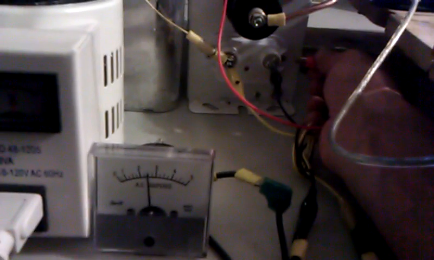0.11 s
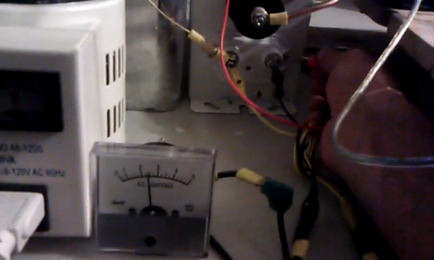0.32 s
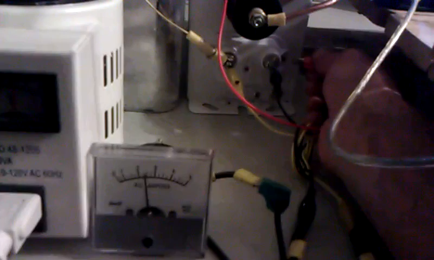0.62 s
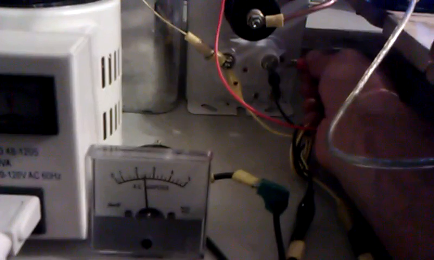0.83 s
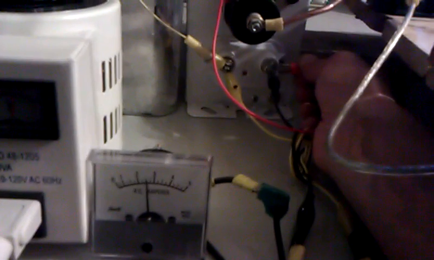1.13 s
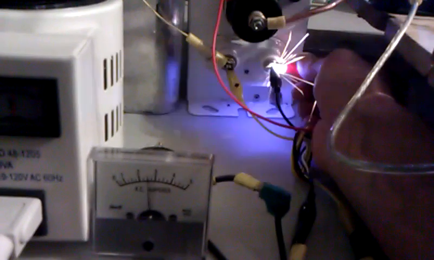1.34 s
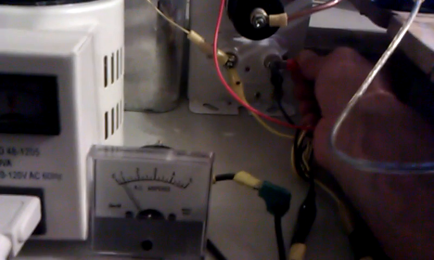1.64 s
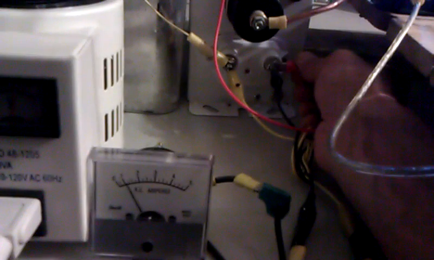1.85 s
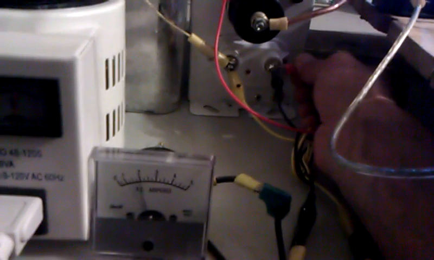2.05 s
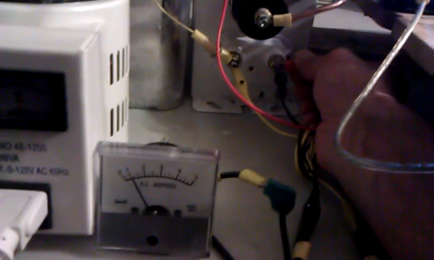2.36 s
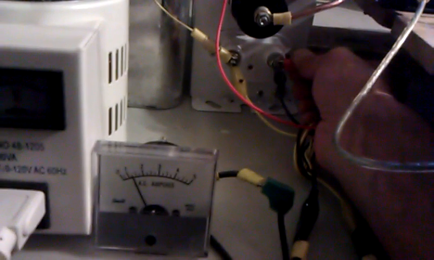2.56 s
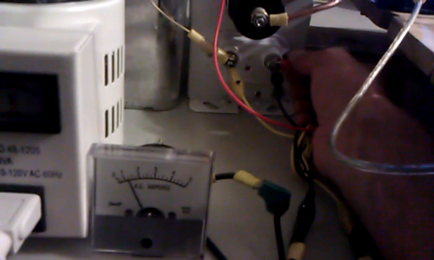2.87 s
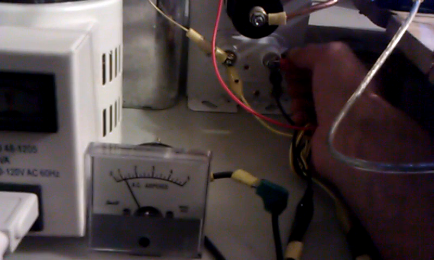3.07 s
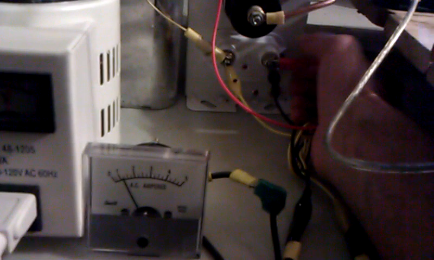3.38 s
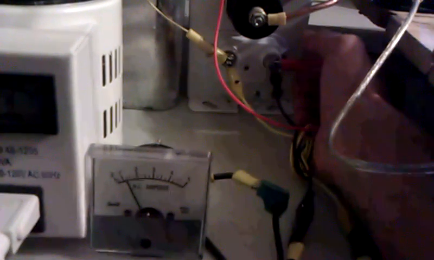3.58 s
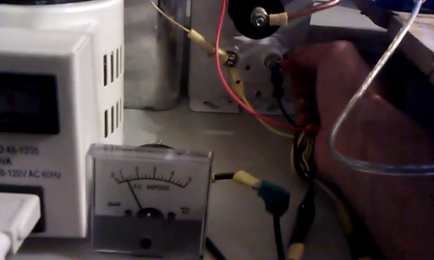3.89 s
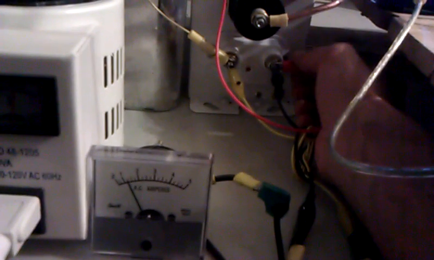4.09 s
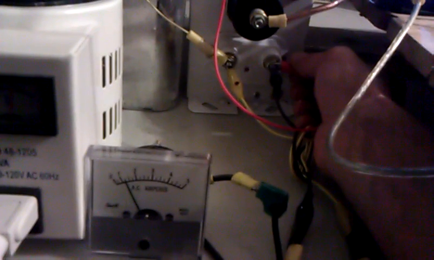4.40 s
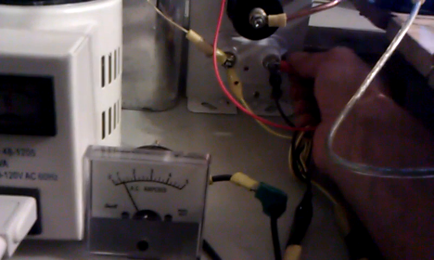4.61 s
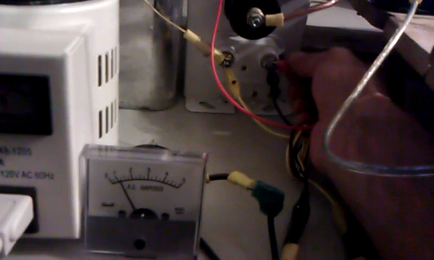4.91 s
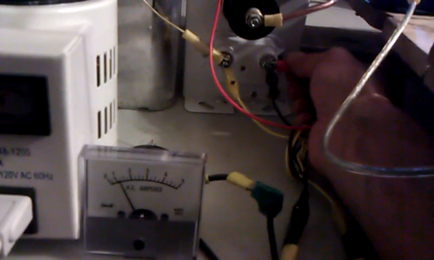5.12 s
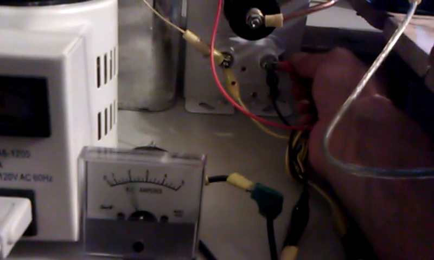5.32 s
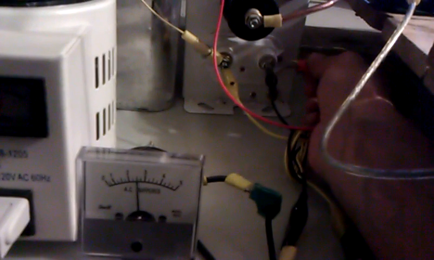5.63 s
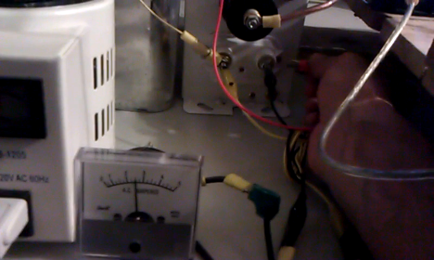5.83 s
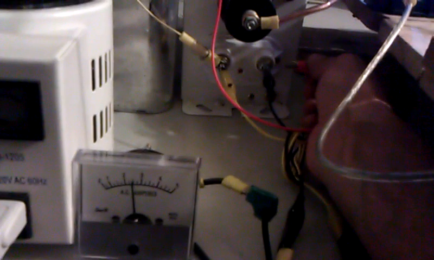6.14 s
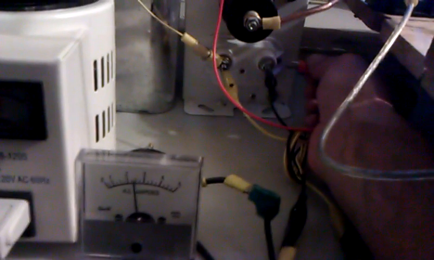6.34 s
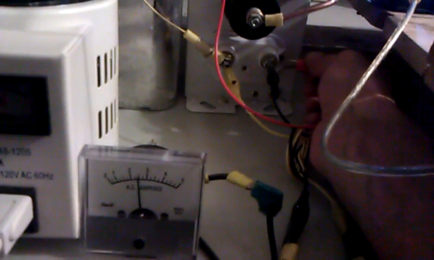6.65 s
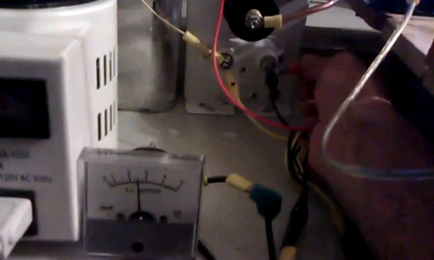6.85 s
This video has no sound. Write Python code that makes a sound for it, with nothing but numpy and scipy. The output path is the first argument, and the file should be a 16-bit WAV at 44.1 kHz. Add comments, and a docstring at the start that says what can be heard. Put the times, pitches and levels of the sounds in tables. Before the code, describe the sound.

Rapid electrical snapping runs without a break as a high-voltage spark jumps a small gap on a workbench. The cracks are crisp, thin and nearly regular, like a fast ticking rattle, each with a very short ringing tail from the small room. The nearby microphone distorts slightly, hisses softly and picks up small low pops of interference with the sparks, a little stronger through the middle.

```python
"""A small workshop, where a capacitor charged by a high-voltage transformer breaks down a spark gap
about fifteen times a second. Each spark is one sharp crack, which bench, cases and walls return in
nearly the same pattern of echoes and resonances. One weak partial discharge adds a dull tick.
The small microphone close by rings in the treble and overloads; its circuit hisses and takes an
electrical kick from each breakdown."""
import sys
import numpy as np
from scipy import signal
from scipy.fft import rfft, irfft, next_fast_len
from scipy.io import wavfile

SR = 44100
rng = np.random.default_rng(int(sys.argv[2]) if len(sys.argv) > 2 else 0)


def store_pcm(level_fs):
    """Save levels as 16-bit WAV."""
    pcm = np.round(np.clip(level_fs, -1, 1) * 32767).astype(np.int16)
    wavfile.write(sys.argv[1], SR, np.atleast_2d(pcm).T)


N = 308259
TAIL = SR // 3  # samples in the response to one spark


def amp(db):
    return 10 ** (np.asarray(db) / 20)


def along(points, hz):
    """Interpolation of (frequency, value) points on a logarithmic frequency axis."""
    point_hz, values = np.transpose(points)
    return np.interp(np.log(hz + 1), np.log(point_hz + 1), values)


def filtered(x, response):
    """Linear filtering: the spectrum is multiplied by a complex frequency response."""
    size = next_fast_len(N + SR)
    return irfft(rfft(x, size) * response(np.fft.rfftfreq(size, 1 / SR)), size)[:N]


def superpose(start_s, sounds):
    """Superposition: the sounds add at their start times, on a track that begins TAIL samples early."""
    track = np.zeros(N + 2 * TAIL)
    for start, sound in zip(start_s, sounds):
        track[round(start * SR) + TAIL:][:len(sound)] += sound
    return track


# Spectrum of the crack as the microphone colours it: frequency_hz, level_db
CRACK_SPECTRUM = [(60, -28.5), (480, -22), (900, -24.5), (2100, -23), (3450, -10.5), (4450, -17.5),
                  (5200, -7), (6260, -1), (7400, -6), (8200, -11), (11500, -7.5), (13800, -1.5), (15500, 4),
                  (16500, -11)]


def crack(band, size=1024):
    """Impulse response: one band of the crack as a minimum-phase pulse with an envelope peak of 1."""
    hz = np.fft.rfftfreq(size, 1 / SR)
    cepstrum = irfft(np.log(band(hz) * amp(along(CRACK_SPECTRUM, hz)) + 1e-4), size)
    causal = np.r_[cepstrum[:1], 2 * cepstrum[1:size // 2], np.zeros(size // 2)]
    pulse = irfft(np.exp(rfft(causal)), size)
    return pulse / np.abs(signal.hilbert(pulse)).max()


def near_scatter(count, rise_s=0.00053, t60_s=0.018):
    """Scattering: parts right beside the gap return a dense burst in the first milliseconds."""
    t = np.arange(TAIL) / SR
    return rng.standard_normal((count, TAIL)) * amp(-60 * t / t60_s) * (1 - np.exp(-(t / rise_s) ** 2))


# Low resonances of the bench: pitch_hz, level_db, t60_s
BENCH_MODES = [(259.7, -22.5, 0.078), (656, -13.5, 0.13)]
# Narrow resonances of cases and cavities around the gap: pitch_hz, level_db, t60_s
CASE_MODES = [(1798.0, -15.0, 0.17), (3510.0, -8.0, 0.17), (4070.0, -14.0, 0.17), (4727.0, -12.0, 0.17),
              (4985.0, -9.0, 0.17), (5050.0, -9.0, 0.17), (5329.0, -6.0, 0.17), (5652.0, -3.0, 0.17),
              (5879.0, 0.0, 0.17), (6180.0, 0.0, 0.17), (6761.0, -2.0, 0.17), (7149.0, -3.0, 0.17),
              (7235.0, -4.0, 0.17), (7569.0, -6.0, 0.17), (7881.0, -8.0, 0.17), (8086.0, -9.0, 0.17),
              (8796.0, -13.0, 0.17), (10034.0, -12.0, 0.17), (10907.0, -13.0, 0.17), (11262.0, -13.0, 0.17),
              (11779.0, -12.0, 0.17), (13404.0, -11.0, 0.17), (13501.0, -11.0, 0.17), (13997.0, -8.0, 0.17),
              (14255.0, -3.0, 0.17), (14750.0, -6.0, 0.17), (15095.0, -5.0, 0.17), (15547.0, 0.0, 0.17)]


def ringing(count, spread_db=5.5, rise_s=0.0012):
    """Free vibration: each crack excites the same damped modes, at the same phases but new strengths."""
    pitch_hz, level_db, t60_s = np.transpose(BENCH_MODES + CASE_MODES)[..., None]
    t = np.arange(TAIL) / SR
    phase_turns = rng.random(pitch_hz.shape)
    modes = amp(level_db - 60 * t / t60_s) * np.sin(2 * np.pi * (pitch_hz * t + phase_turns))
    strengths = amp(spread_db * rng.standard_normal((count, len(pitch_hz))))
    return strengths @ modes * (1 - np.exp(-t / rise_s))


# Echoes from hard parts too small to reflect bass: delay_ms, mid_db, treble_db
PART_ECHOES = [(3.898, -13.5, -4.5), (4.5, -5.5, -13), (6.318, -5, -7), (7.42, -3.5, -19),
               (8.043, -9.5, -8), (9.4, 1.5, -14), (10.3, -4, -16), (12.61, -12, 0), (13.62, -3.5, -16),
               (16.3, -6, -11), (17.58, -8, -10), (22.66, -11, -21), (26.7, -16, -23), (29.7, -12, -28),
               (39.6, -23, -31)]


def arrivals(direct_ms=0.7, round_trip_ms=8.05, clutter_count=30):
    """Reflection: delays and band levels of the direct sound, its flutter echo and the smaller echoes."""
    trips = np.arange(5)  # the direct sound, then four returns between two large surfaces
    flutter_ms = direct_ms + round_trip_ms * trips
    # Each triple is bass, mid, treble.
    flutter_db = np.vstack((-15.5, -8, -16)) - np.outer((2.3, 1.7, 1.5), trips ** 2)
    part_ms, mid_db, treble_db = np.transpose(PART_ECHOES)
    part_db = [np.full(len(part_ms), -np.inf), mid_db, treble_db]
    position = (np.arange(clutter_count) + rng.random(clutter_count)) / clutter_count
    clutter_ms = 1.4 + (42 - 1.4) * position ** 1.3  # weaker echoes fill the gaps
    clutter_db = np.vstack((-31, -10.5, -9)) - np.outer((0.6, 0.24, 0.14), clutter_ms)
    clutter_db += rng.normal(0, 2.4, (3, clutter_count))
    return np.r_[flutter_ms, part_ms, clutter_ms], *np.hstack([flutter_db, part_db, clutter_db])


# Reverberation time of the workshop: frequency_hz, t60_s
ROOM_DECAY = [(300, 0.056), (1400, 0.17), (3700, 0.19), (6300, 0.21), (9700, 0.16), (15500, 0.13)]


def reverberation(count, rise_s=0.009):
    """Diffuse field: noise builds up, then decays exponentially at a rate set by frequency."""
    hz, t, spectra = signal.stft(rng.standard_normal((count, TAIL)), SR, nperseg=128)
    decay = amp(-60 * t / along(ROOM_DECAY, hz)[:, None])
    tails = signal.istft(spectra * decay, SR, nperseg=128)[1][:, :TAIL]
    return tails * (1 - np.exp(-np.arange(TAIL) / SR / rise_s))


def scattered_field(noise, fresh_share=0.4, cutoff_hz=225):
    """Partial coherence: all sparks share the first row of noise, and each adds a row of its own."""
    field = np.sqrt(1 - fresh_share) * noise[0] + np.sqrt(fresh_share) * noise[1:]
    # Small objects and a small room scatter little bass.
    return signal.sosfilt(signal.butter(2, cutoff_hz, "high", fs=SR, output="sos"), field)


# Breakdowns of the gap, already firing as the scene opens (relative levels): start_s, crack_db, kick_db
BREAKDOWNS = [(-.039, -13, -25), (0.0255, -9.5, -20.5), (0.0852, -9.5, -30), (0.1602, -10, -24),
              (.219, -10, -30), (0.2811, -10, -40), (.353, -9.5, -36), (0.4191, -9.5, -34),
              (0.486, -8.5, -20), (0.5549, -10, -19), (.6177, -10.5, -25), (0.6834, -8.5, -29),
              (.751, -9, -34), (.819, -8.5, -34), (0.8897, -8, -20), (.9512, -9.5, -31),
              (1.0194, -9.5, -30), (1.0871, -9.5, -23), (1.139, -10.5, -30), (1.2014, -9.5, -17),
              (1.2715, -9.5, -22), (1.3389, -10, -22), (1.4088, -9, -23), (1.4733, -10, -22),
              (1.5347, -9.5, -22), (1.6032, -8.5, -20), (1.666, -10, -22), (1.7346, -9, -22),
              (1.8027, -9, -15.5), (1.87, -8.5, -16), (1.9376, -9, -18), (2.002, -9.5, -21),
              (2.0687, -9, -19), (2.142, -9, -22), (2.2156, -13, -3.5), (2.2987, -12.5, -12.5),
              (2.3734, -12.5, -14), (2.436, -11.5, -11.5), (2.5026, -10.5, -13), (2.569, -10.5, -18.5),
              (2.635, -10, -16), (2.7013, -10, -17), (2.7696, -10, -12.5), (2.8341, -10.5, -17),
              (2.903, -10, -14.5), (2.967, -10, -15), (3.0352, -9.5, -18), (3.103, -9.5, -15),
              (3.166, -9.5, -15), (3.235, -8.5, -18), (3.3, -9.5, -19), (3.3687, -8.5, -16),
              (3.4327, -10, -25), (3.5048, -8.5, -25), (3.5685, -9, -15), (3.6358, -8.5, -22),
              (3.704, -9, -15), (3.769, -8.5, -13), (3.8333, -10, -19), (3.9013, -10.5, -22),
              (3.9689, -9.5, -13.5), (4.0341, -8.5, -15), (4.1034, -8.5, -22), (4.1674, -8.5, -16),
              (4.2323, -10, -19), (4.3038, -8.5, -16), (4.3692, -9.5, -14), (4.433, -9, -23),
              (4.5001, -8.5, -18), (4.566, -9, -19), (4.6344, -9.5, -19), (4.701, -9.5, -26),
              (4.7675, -10, -26), (4.8322, -10.5, -21), (4.8986, -10.5, -21), (4.9763, -8.5, -23),
              (5.0371, -7.5, -21), (5.103, -8, -17), (5.1527, -11.5, -20), (5.2253, -10.1, -31),
              (5.288, -9, -20), (5.353, -7.5, -17), (5.4204, -8.5, -32), (5.4832, -9, -39),
              (5.5533, -8, -39), (5.6182, -8.5, -18), (5.6856, -8.5, -29), (5.7514, -8.5, -29),
              (5.819, -8, -31), (5.885, -8.8, -37), (5.9569, -8.5, -26), (6.018, -8.8, -39),
              (6.084, -8, -32), (6.1498, -9.5, -22), (6.2265, -9.5, -27), (6.2977, -8.5, -30),
              (6.3759, -8, -30), (6.4352, -9, -32), (6.505, -8.5, -32), (6.576, -9, -26),
              (6.6353, -9.5, -32), (6.7008, -7.5, -26), (6.7704, -9, -27), (6.8397, -9, -46),
              (6.9007, -10, -37), (6.9668, -8, -41)]


def sparks(wander_db=2, wander_ms=0.012, bass_edge_hz=2500, treble_edge_hz=9500):
    """Convolution: every crack takes the same paths, varied a little as the arc wanders in the gap."""
    start_s, crack_db, _ = np.transpose(BREAKDOWNS)
    count = len(start_s)
    bass_shift_db, treble_shift_db = rng.normal([0, -0.6], [1.33, 1.13], (count, 2)).T
    delay_ms, bass_db, mid_db, treble_db = arrivals()
    tails = scattered_field(reverberation(count + 1))
    near = scattered_field(near_scatter(count + 1))
    delay_jitter, level_jitter = rng.standard_normal((2, count, len(delay_ms)))
    lag = np.round((delay_ms + wander_ms * delay_jitter) * SR / 1000).astype(int)
    below = lambda hz, edge_hz: 1 / (1 + (hz / edge_hz) ** 8)
    bass = lambda hz: below(hz, bass_edge_hz)
    mid = lambda hz: below(hz, treble_edge_hz) - bass(hz)
    treble = lambda hz: 1 - below(hz, treble_edge_hz)
    bands = [(bass, bass_db, -27, -39, crack_db + bass_shift_db),
             (mid, mid_db, -13, -20.5, crack_db),
             (treble, treble_db, -11, -18, crack_db + treble_shift_db)]
    rings = amp(crack_db - 29)[:, None] * ringing(count)
    sound = superpose(start_s, rings)[TAIL:][:N]
    for band, arrival_db, near_db, tail_db, level_db in bands:
        paths = amp(near_db) * near + amp(tail_db) * tails
        np.add.at(paths, (np.arange(count)[:, None], lag), amp(arrival_db + wander_db * level_jitter))
        train = superpose(start_s, amp(level_db)[:, None] * paths)
        pulse = crack(band)
        peak = np.argmax(np.abs(pulse))  # the pulse peaks at each arrival time
        sound += signal.fftconvolve(train, pulse)[TAIL + peak:][:N]
    return amp(13.5) * sound


def electrical_kicks(peak_ms=1.72, sharpness=12):
    """Electrical interference: each discharge current briefly pulls the microphone circuit negative."""
    start_s, _, kick_db = np.transpose(BREAKDOWNS)
    t = np.arange(SR // 4) / SR
    progress = t * 1000 / peak_ms
    dip = -(progress * np.exp(1 - progress)) ** sharpness
    rebound = 0.2 * np.exp(-t / 0.045) * (1 - np.exp(-(t / 0.003) ** 2))
    kicks = [size * dip + size ** 3 * rebound for size in amp(kick_db)]  # a strong kick upsets the bias
    return superpose(start_s, kicks)[TAIL:][:N]


def circuit_hiss(low_hz=200, high_hz=1000):
    """Electronic noise: the steady, band-limited floor of the microphone circuit."""
    passband = lambda hz: (1j * hz / (low_hz + 1j * hz)) ** 2 / (1 + 1j * hz / high_hz)
    return amp(-33) * filtered(rng.standard_normal(N), passband)


# A weak discharge between two breakdowns, with no audible echo: start_s, level_db
PARTIAL_DISCHARGES = [(1.398, -15)]


def tick(snap_t60_s=0.0075, knock_t60_s=0.051, knock_hz=790, cutoff_hz=6000):
    """Partial discharge: a short, dull snap with a damped knock of the bench."""
    t = np.arange(SR // 20) / SR
    snap = amp(-60 * t / snap_t60_s) * rng.standard_normal(len(t))
    knock = 0.3 * amp(-60 * t / knock_t60_s) * np.sin(2 * np.pi * knock_hz * t)
    start_s, level_db = np.transpose(PARTIAL_DISCHARGES)
    sound = superpose(start_s, amp(level_db)[:, None] * (snap + knock))[TAIL:][:N]
    return filtered(sound, lambda hz: 1 / (1 + 1j * hz / cutoff_hz))


def scene():
    """Superposition: airborne sound and electrical disturbances add in one channel."""
    return (sparks() + electrical_kicks() + circuit_hiss() + tick())[None]


def record(dry, positive_limit=0.69, negative_limit=0.75, hardness=3):
    """Asymmetric saturation in the capsule amplifier, then capacitive coupling, band limit and clipping."""
    coupling_hz, top_hz, stop_hz = 0.4, 15780, 17146
    limit = np.where(dry > 0, positive_limit, negative_limit)
    saturated = dry / (1 + np.abs(dry / limit) ** hardness) ** (1 / hardness)
    coupled = filtered(saturated[0], lambda hz: 1j * hz / (coupling_hz + 1j * hz))
    skirt = lambda hz: amp(-15 - 17 * (hz - top_hz) / (stop_hz - top_hz)) * (hz < stop_hz)
    band_limited = filtered(coupled, lambda hz: np.where(hz < top_hz, 1, skirt(hz)))
    return np.clip(band_limited, -1, 1)[None]


dry = scene()
out = record(dry)
store_pcm(out)
```